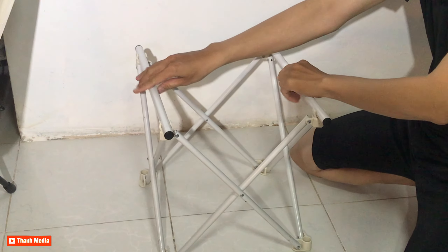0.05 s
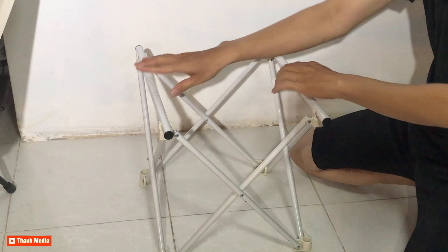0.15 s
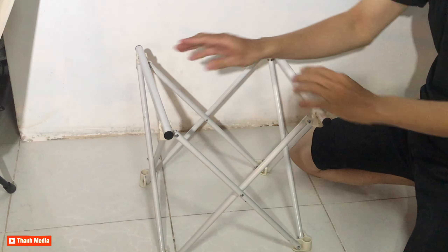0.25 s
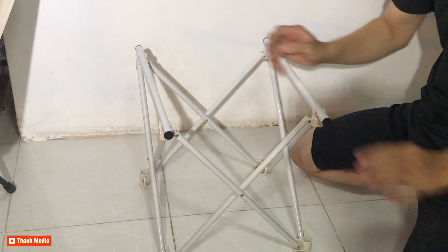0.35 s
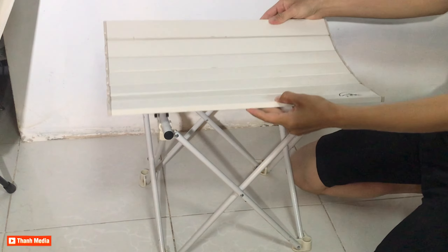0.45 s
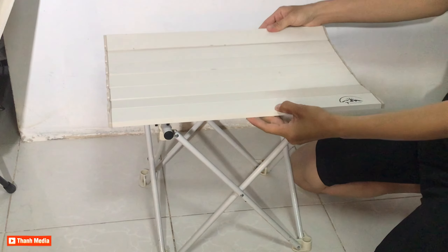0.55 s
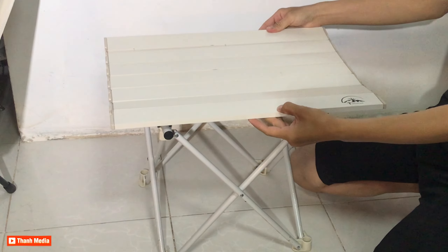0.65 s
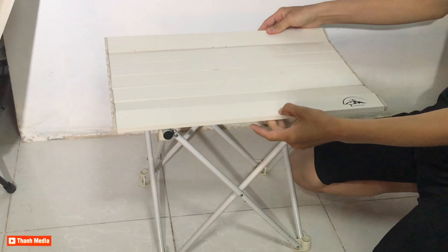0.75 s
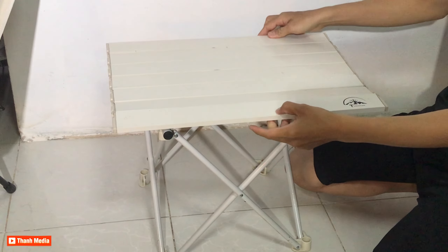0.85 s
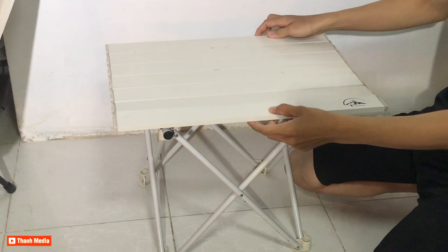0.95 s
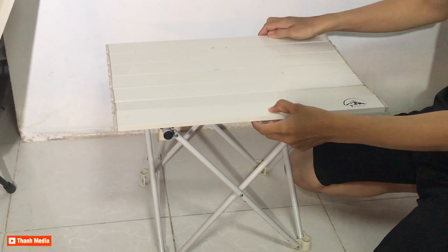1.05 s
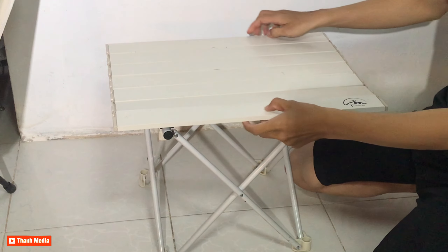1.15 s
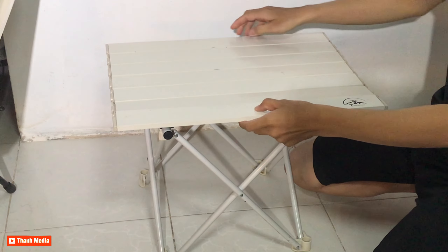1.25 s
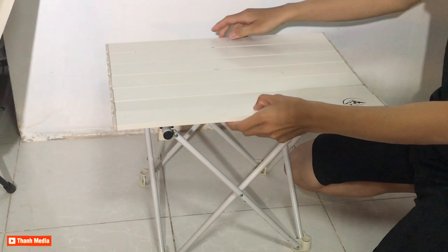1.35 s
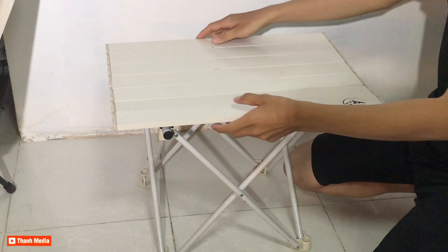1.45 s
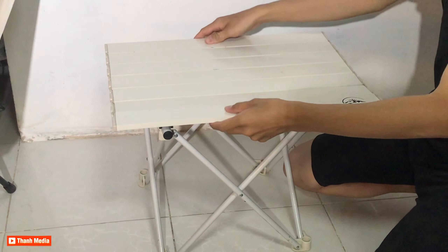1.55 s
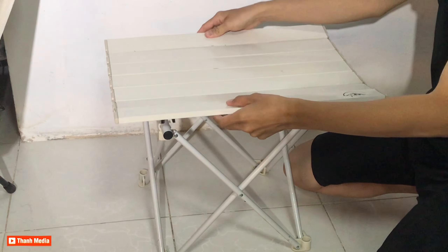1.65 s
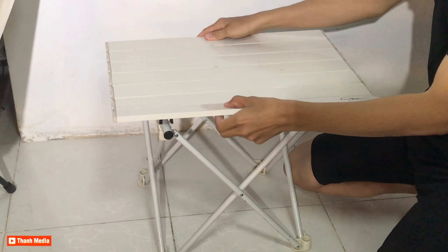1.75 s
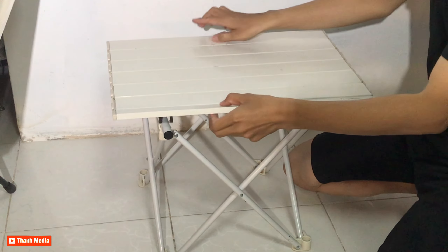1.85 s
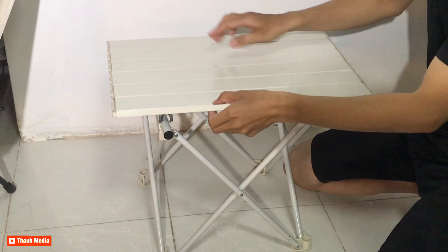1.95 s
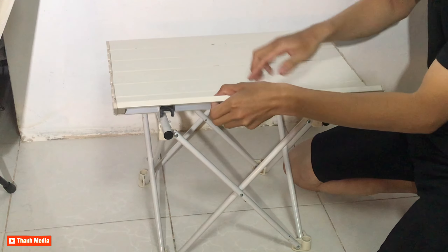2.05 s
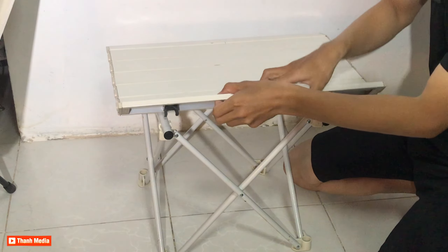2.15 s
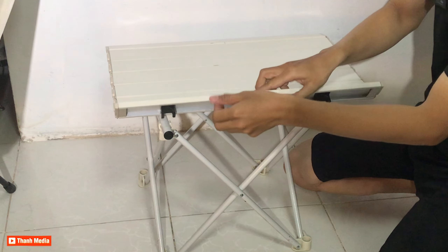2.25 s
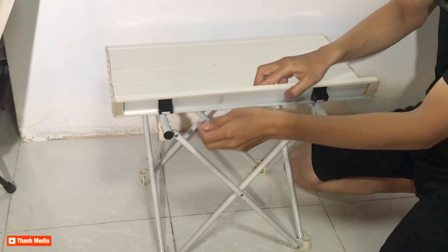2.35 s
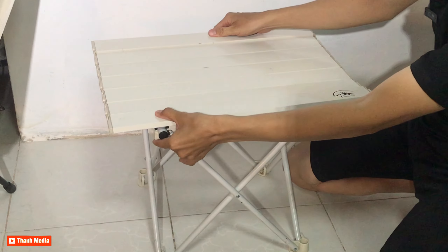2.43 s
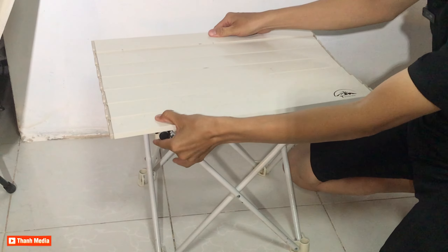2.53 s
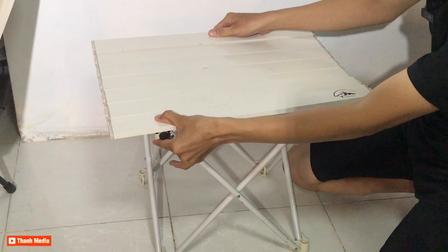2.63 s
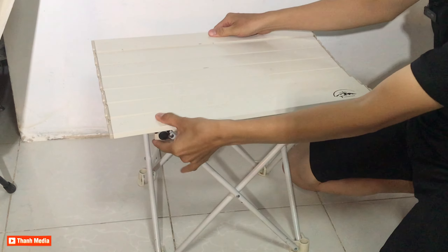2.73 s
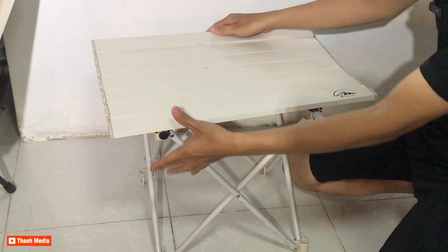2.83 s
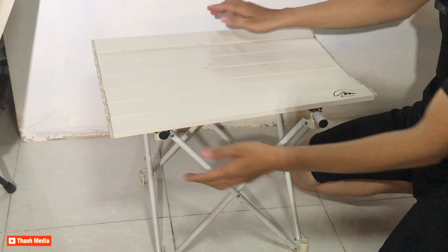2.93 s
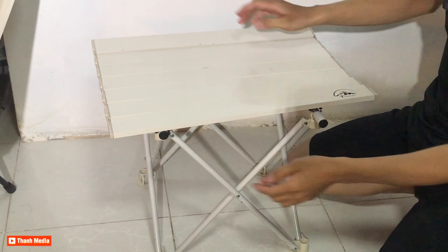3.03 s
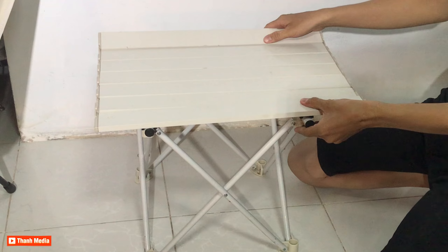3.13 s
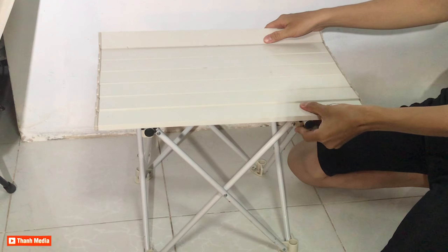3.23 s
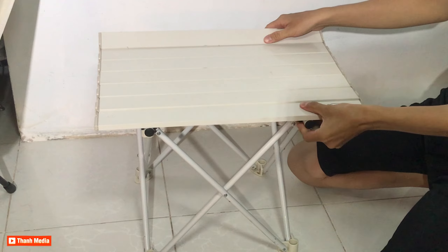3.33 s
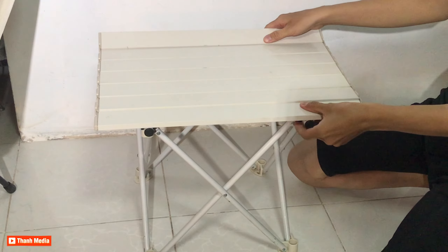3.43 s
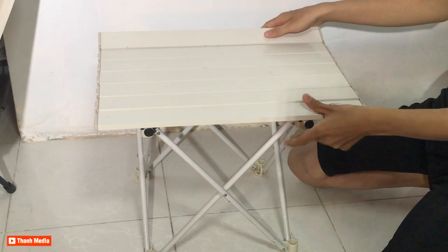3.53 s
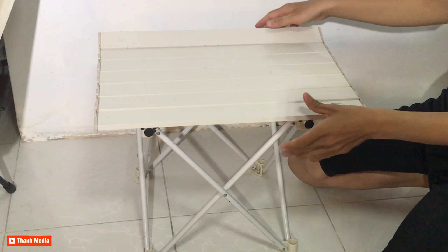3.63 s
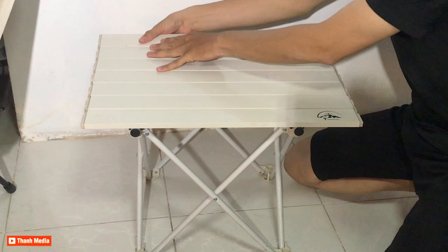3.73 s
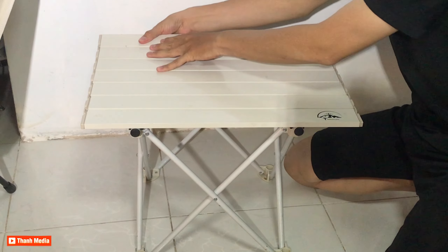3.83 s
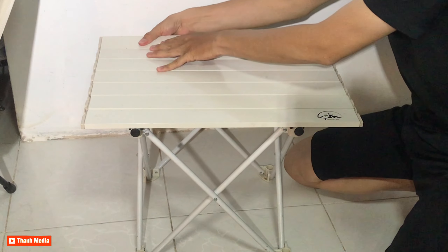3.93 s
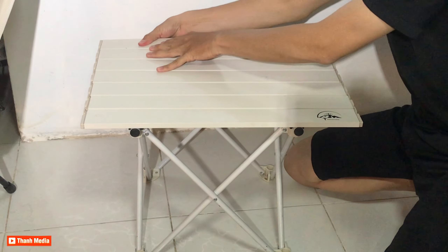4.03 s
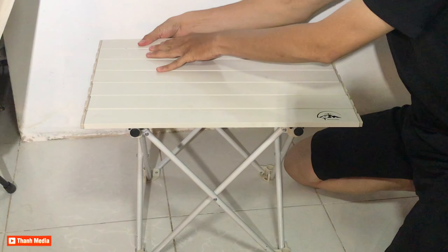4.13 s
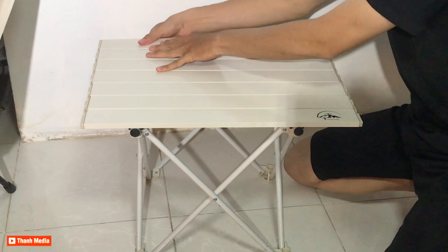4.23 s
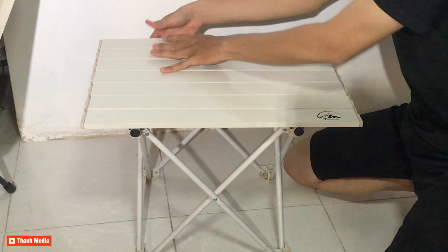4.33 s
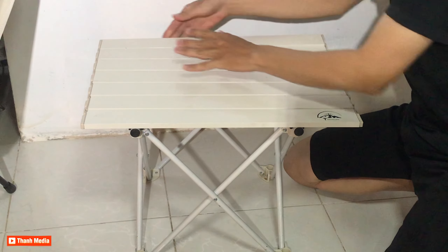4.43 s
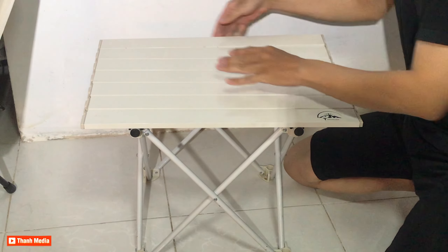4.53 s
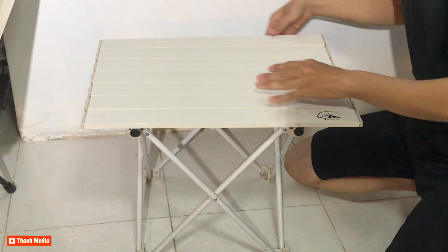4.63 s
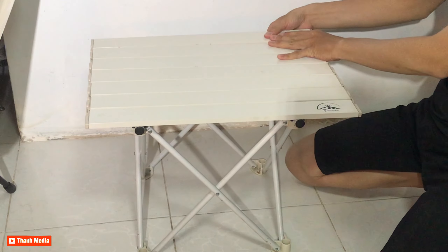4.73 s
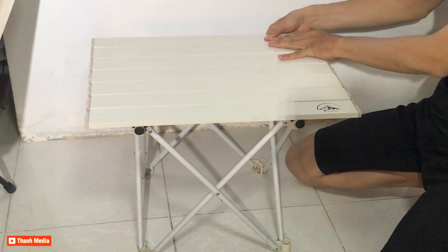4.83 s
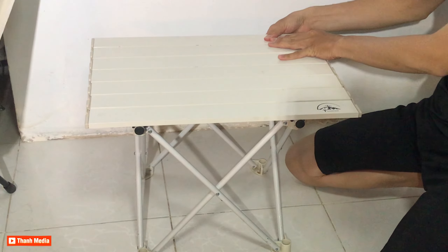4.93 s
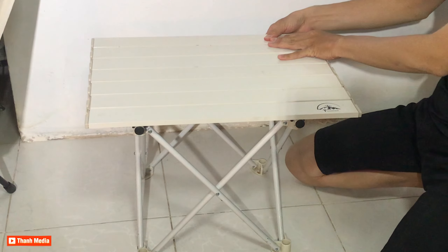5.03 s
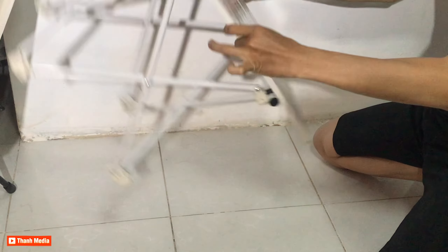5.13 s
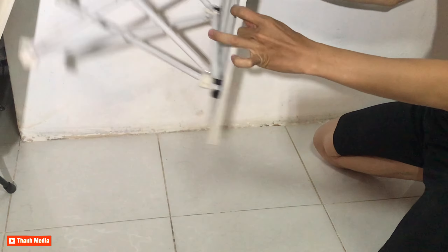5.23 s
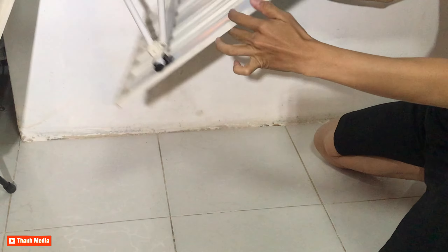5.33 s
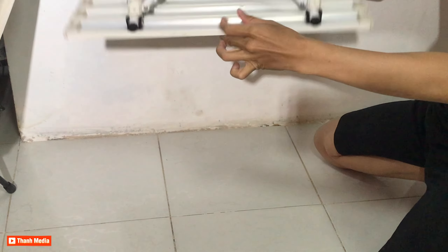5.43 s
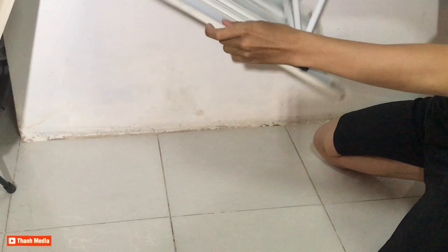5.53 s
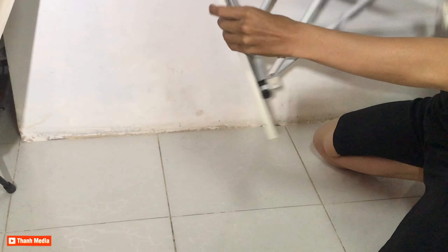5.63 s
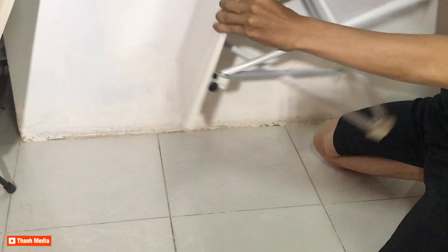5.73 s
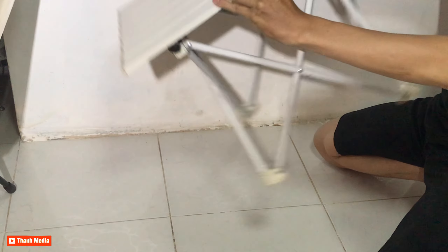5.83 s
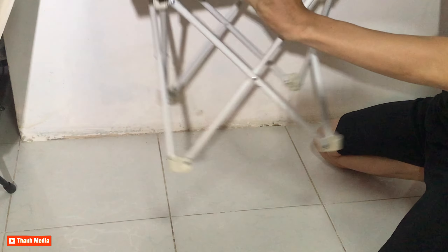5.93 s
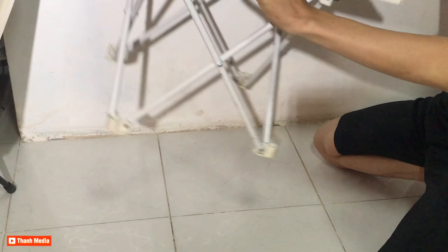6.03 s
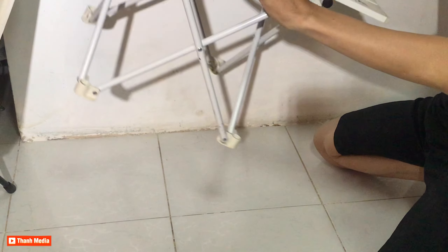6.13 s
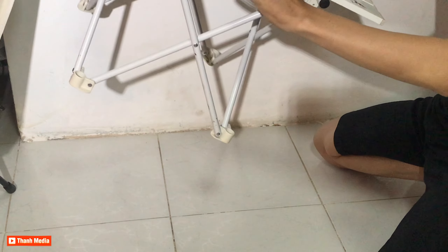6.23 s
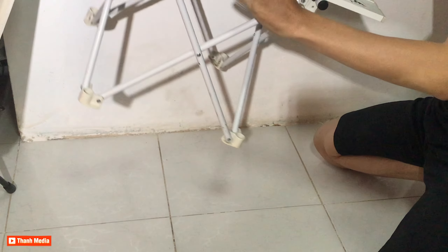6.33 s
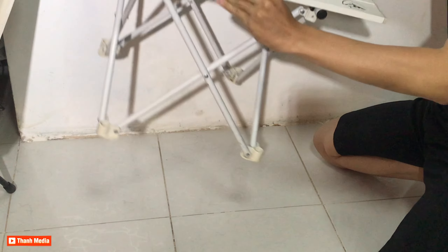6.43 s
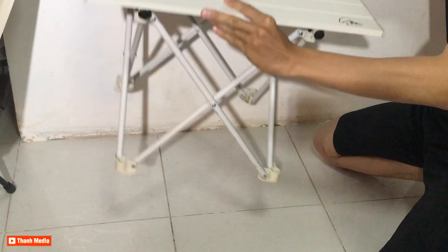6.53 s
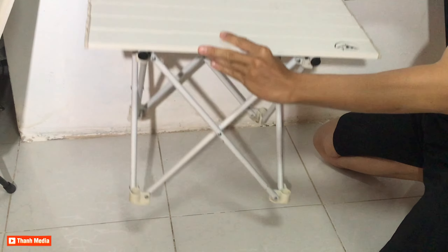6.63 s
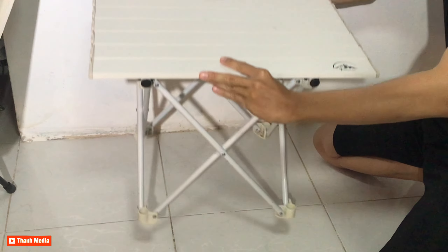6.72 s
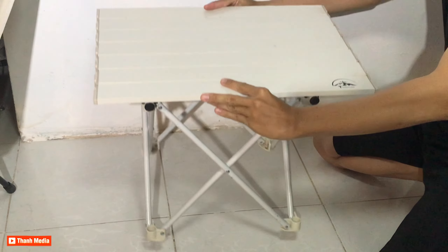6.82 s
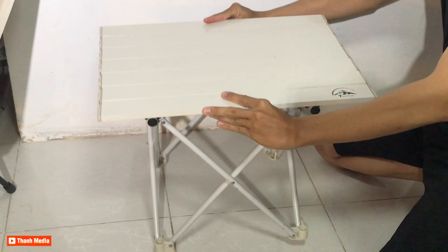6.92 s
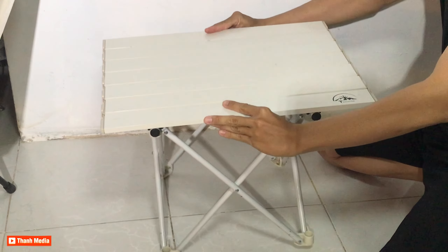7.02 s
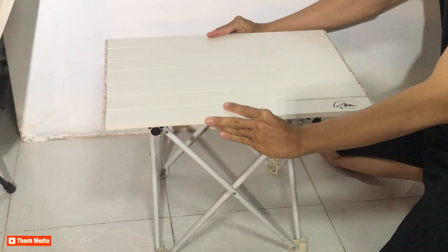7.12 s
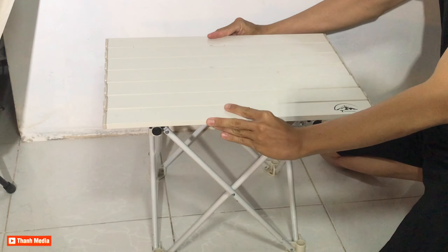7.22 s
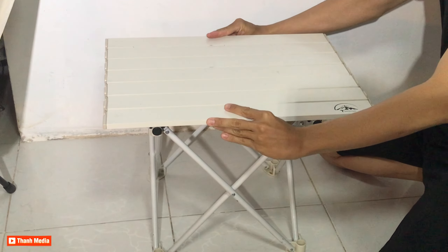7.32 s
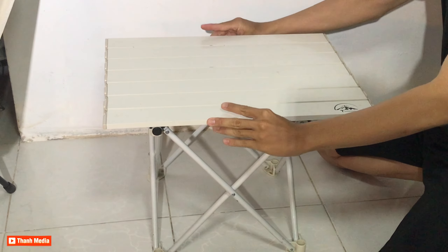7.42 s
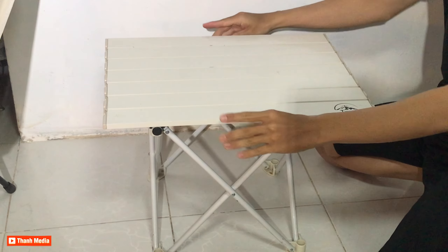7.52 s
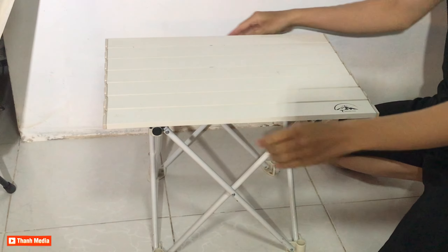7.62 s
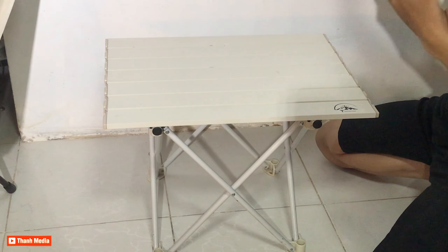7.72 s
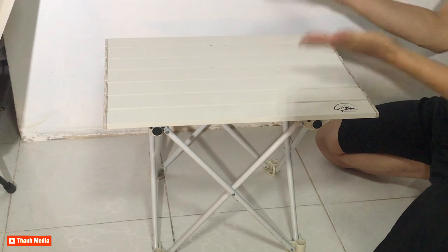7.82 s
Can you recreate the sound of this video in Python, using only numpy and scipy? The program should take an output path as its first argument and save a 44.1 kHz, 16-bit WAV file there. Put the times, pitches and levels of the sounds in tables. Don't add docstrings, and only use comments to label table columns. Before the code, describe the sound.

Close, sharp clacks and rattles as a folding table's top is fitted and snapped onto its tube legs, with quiet handling and softer knocks afterwards.

```python
import sys
import numpy as np
from scipy import signal
from scipy.fft import rfft, irfft
from scipy.io import wavfile
from scipy.ndimage import uniform_filter1d

SR = 44100
rng = np.random.default_rng(int(sys.argv[2]) if len(sys.argv) > 2 else 0)


def undo_db(level):
    steps = np.asarray(level, float) / 20
    return 10 ** steps


def transcribe(u):
    v = np.clip(np.atleast_2d(u).T, -1, 1)
    q = np.round(v * 32767).astype(np.int16)
    wavfile.write(sys.argv[1], SR, q)


N = 347067

# f/Hz, level/dB, t60/s
TABLE = [(215, -4, 0.33), (296, -4.5, 0.36), (532, -1, 0.16), (565, -5.5, 0.57), (721, -29.5, 0.54),
         (809.5, 4, 0.043), (960, -8, 0.099), (1000, -4, 0.12), (970, -9, 0.091), (1532, -3.5, 0.12),
         (1650, -5, 0.84), (1890, -5.5, 0.058)]
# f/Hz, level/dB, t60/s
SLATS = [(319, 3, 0.61), (559, 3, 0.4), (736, 5.5, 0.27), (900, -8, 0.35), (972, -14, 0.12),
         (1271, -18.5, 0.39)]
# f/Hz, t60/s
ROOM_T60 = [(150, 0.21), (400, 0.16), (1000, 0.26), (2800, 0.26), (7000, .25), (14000, 0.087)]


def rms_one(x):
    return x / np.sqrt(np.mean(x ** 2) + 1e-20)


def at_hz(points, hz):
    return np.interp(np.log(hz), np.log(np.array(points)[:, 0]), np.array(points)[:, 1])


def convolve(x, response):
    return signal.fftconvolve(x, response)[:N]


def bandpass(x, low_hz, high_hz):
    return signal.sosfilt(signal.butter(2, [low_hz, high_hz], "band", fs=SR, output="sos"), x)


def split(x, k):
    low_hz, high_hz = [(120, 450), (450, 2000), (2000, 4000), (4000, 15800)][k]
    return (-1) ** k * bandpass(x, low_hz, high_hz)


def colour(spectrum, peaks=()):
    hz = np.maximum(np.arange(2049) * SR / 4096, 10)
    level_db = at_hz(spectrum, hz)
    for top_hz, width_hz, db in peaks:
        level_db = level_db + db / (1 + (2 * (hz - top_hz) / width_hz) ** 2)
    cepstrum = irfft(np.log(undo_db(level_db)))
    cepstrum[1:2048] *= 2
    cepstrum[2049:] = 0
    response = irfft(np.exp(rfft(cepstrum)))
    return response / np.sqrt(np.sum(response ** 2))


def contact_colour():
    # f/Hz, level/dB per Hz
    crack = [(60, -65), (140, -32.5), (200, -4.5), (290, -7), (450, -6.5), (750, -3.5), (1050, -3.5),
             (1500, -10.5), (2050, -25.5), (3000, -28), (4000, -33.5), (6500, -37), (9500, -45),
             (15600, -56)]
    # f/Hz, width/Hz, level/dB
    bright = [(1710, 600, 3.5), (2680, 520, 9.5), (3750, 670, -2.5), (4650, 580, 6.5), (5563, 850, 7.5),
              (7280, 450, 7.5), (8350, 630, 5), (13600, 1200, 5.5)]
    return colour(crack, bright)


def ring(clicks, hz, t60):
    radius = undo_db(-60 / (t60 * SR))
    turn = 2 * np.pi * hz / SR
    return signal.lfilter([0, np.sin(turn)], [1, -2 * radius * np.cos(turn), radius ** 2], clicks + 1e-18)


def drift(rate):
    count = int(N / SR * rate) + 2
    return np.interp(np.arange(N), np.linspace(0, N, count), rng.standard_normal(count))


def grains(per_s, spread_db):
    happens = rng.random(N) < per_s / SR
    size = undo_db(spread_db * np.minimum(rng.exponential(1, N), 4))
    return happens * size * rng.choice([-1, 1], N)


def body(clicks, share):
    rings = sum(undo_db(level_db) * ring(clicks, hz, share * t60) for hz, level_db, t60 in TABLE + SLATS)
    broad = rms_one(convolve(clicks, contact_colour()))
    both = rms_one(undo_db(-8.5) * rms_one(rings) + broad)
    return [split(both, k) for k in range(4)]


def swelling_rings(rows, gain_db, rise_s):
    out, t = np.zeros(N), np.arange(6000) / SR
    for s, peak_db, hz, t60 in rows:
        fade = undo_db(peak_db + gain_db - 60 * t / t60)
        wave = np.sin(2 * np.pi * hz * t) * (1 - np.exp(-t / rise_s)) * fade
        out[round(s * SR) + 130:][:t.size] += wave
    return out


def ambience():
    # f/Hz, level/dB per Hz
    background = [(15, -29), (33, -4.5), (41, 5), (91, -8), (130, -9.5), (253, -15.5), (399, -16.5),
                  (469, -22), (597, -22), (1020, -33), (1900, -41.5), (2770, -37), (4250, -44),
                  (5560, -42.5), (15500, -47.5)]
    # f/Hz, width/Hz, level/dB
    hum = [(153.3, 9, -61), (368, 4.3, -74.5), (409, 3.1, -73), (567, 6, -77)]
    out, borders_hz = 0, [40, 200, 700, 2200, 19000]
    for low_hz, high_hz, patchy_db in zip(borders_hz, borders_hz[1:], [1.598, 1.0, 1.9, .6]):
        noise = convolve(rng.standard_normal(N), colour(background))
        out = out + undo_db(-53 + patchy_db * drift(30)) * bandpass(noise, low_hz, high_hz)
    for hz, width_hz, level_db in hum:
        once = ring(rng.standard_normal(N), hz, 2.2 / width_hz)
        out += undo_db(level_db) * rms_one(ring(once, hz, 2.2 / width_hz))
    return out


def motor():
    # f/Hz, level/dB rms
    tones = [(19, -66.5), (153.5, -59.5), (205, -70.5)]
    t = np.arange(N) / SR
    sway_db = 2.5 * np.sin(2 * np.pi * 1.7 * t) * np.sin(2 * np.pi * .6 * t)
    return sum(np.sqrt(2) * undo_db(level_db + sway_db) * np.sin(2 * np.pi * hz * t) for hz, level_db in tones)


def handling():
    # t/s, level/dB
    pace = [(0.0, -65), (0.35, -61.5), (0.95, -51), (1.3, -67), (1.7, -46.5), (1.9, -65), (2.15, -45),
            (2.4, -69), (2.9, -65.5), (3.4, -67), (3.8, -70.5), (4.14, -60), (4.5, -66), (5.1, -64),
            (5.6, -60), (6.0, -65.5), (7.2, -63), (7.87, -64)]
    s, level_db = np.transpose(pace)
    rub_db = np.interp(np.arange(N) / SR, s, level_db)
    rustle_db = -69 + 0.45 * (rub_db - rub_db.mean())
    thud, knock, clack, tick = body(grains(2600, 2.4) * undo_db(3.9 * drift(30)), share=.12)
    rub = undo_db(rub_db - 6.0) * (undo_db(1.5) * thud + knock + undo_db(-6.5) * clack)
    return rub + undo_db(rustle_db - 8.5) * rms_one(tick)


def ticks(length_s, width_share):
    # t/s, peak/dB, f/Hz
    joint_ticks = [(0.437, -53, 6160), (6.3, -69, 6410), (6.489, -71, 5830), (6.537, -64.5, 6180),
                   (6.6374, -57.5, 6330), (6.7334, -66.5, 5620), (6.7694, -71, 5940), (6.995, -61, 6450),
                   (7.6806, -56.5, 5670)]
    out, t = np.zeros(N), np.arange(1000) / SR
    for s, peak_db, hz in joint_ticks:
        puff = rng.standard_normal(t.size) * np.exp(-t / length_s)
        limits_hz = [hz * (1 - width_share), hz * (1 + width_share)]
        sos = signal.butter(1, limits_hz, "band", fs=SR, output="sos")
        out[round(s * SR):][:t.size] += undo_db(peak_db + 7.5) * signal.sosfilt(sos, puff)
    return out


def hits():
    # t/s, peak/dB, knock f/Hz, hardness/dB
    rattles = [(0.475, -7.5, 710.4, 5), (0.488, -12.5, 560, 0), (0.499, -14, 960, 15), (0.523, -14, 970, 1),
               (0.544, -17, 490, 9), (0.589, -17, 1560, -10), (0.63, -21, 1040, -10),
               (0.71, -24.5, 1006, -11), (0.737, -12.5, 565, 2.5), (0.831, -23, 970, -0.5),
               (0.894, -10, 781, 1.5), (1.668, -35, 569, -13), (1.709, -16, 837, 0), (1.729, -11, 1510, 1),
               (1.752, -3.5, 1155, -4), (1.845, -22.5, 1620, -7), (1.876, -31, 910, -6),
               (1.891, -27.5, 990, -4.5), (2.011, -31.5, 721, -34), (2.133, -33, 710, -7),
               (2.155, -11.5, 765, 0.5), (2.179, -16.5, 718, -4.5), (2.206, -9, 708.5, -1.5),
               (2.241, -11.5, 970, -6), (7.045, -28, 540, 7.5), (7.069, -21, 700, 2.5),
               (7.164, -28, 730, -3), (7.19, -10.5, 785, -8), (7.219, -20, 500, 3.5),
               (7.249, -21.5, 710, -7)]
    # t/s, peak/dB, knock f/Hz, hardness/dB
    snaps = [(2.5155, -16.5, 890, 3), (2.519, 0, 717, 3.5), (2.543, -5.5, 1478, -11),
             (2.587, -10.5, 791, 0), (3.2035, 1.5, 746, 2.5), (3.209, -12.5, 287, -9.5),
             (3.251, -17.5, 912, 4), (3.934, -15.5, 704, -2.5), (3.959, -8.5, 562, -2.5),
             (4.008, 0.5, 1080, 2.5), (4.046, -11, 1085, -9.5), (4.834, -13.5, 1197, 2),
             (4.846, -0.5, 290, -1), (4.856, -13.5, 780, -4.5), (5.277, -19, 466, 1.5),
             (5.756, -15.5, 730, 0.5), (5.765, -23, 487, -2), (5.789, -23, 1104, -10.5)]
    # t/s, peak/dB, knock f/Hz, hardness/dB
    taps = [(1.194, -32, 1140, 0), (1.254, -45, 296, 3), (1.317, -43, 706, 9), (1.526, -48, 826, 6.5),
            (1.576, -40, 835, 4), (1.631, -40, 972, 4), (2.413, -41, 267, -1), (2.774, -38, 360, 2),
            (2.834, -40, 970, 1), (3.006, -39, 865, -0.5), (3.164, -36.5, 764, -3), (3.442, -51, 287, 12),
            (3.514, -49.5, 1280, 15.5), (3.641, -54.5, 270.4, 6), (4.28, -37, 696, 2.5),
            (4.31, -40.5, 830, 3.5), (4.808, -44, 544, -2)]
    # t/s, peak/dB, knock f/Hz, hardness/dB
    shifts = [(5.129, -46.5, 730, -7.5), (5.213, -41.5, 477, -15), (5.239, -40.5, 463, 1),
              (5.299, -59, 590, 0), (5.318, -51.5, 550, 13.5), (5.352, -37.5, 560, 4),
              (5.416, -44.5, 348, 5), (5.45, -44, 990, 5), (5.518, -46.5, 920, 3), (5.551, -33, 320, -4),
              (5.581, -45, 580, 10), (5.69, -44, 483, -6), (5.919, -45, 258.4, 2), (6.218, -48, 255.4, -8),
              (6.959, -52.5, 403.5, 13.5), (7.397, -42.5, 1460, 1.5)]
    hardness_share = (-0.2, 0.9, 1)
    kinds = [(rattles, (-14, -11.5, -20)), (snaps, (-13, -14.5, -17)),
             (taps, (-6, -16.5, -22)), (shifts, (2, -15, -20))]
    out = []
    for rows, kind_db in kinds:
        for s, peak_db, hz, hard_db in rows:
            low_db = -2 * np.log2(hz / 700)
            colour_db = np.add(kind_db, np.multiply(hardness_share, hard_db)) + [low_db, 0, 0]
            out.append((s, peak_db, *colour_db, hz))
    return sorted(out)


def chatter_of(size, touch, peak_db, chatter_s):
    t = np.arange(size.size) / SR
    linger_s = chatter_s * undo_db(-.2 * (peak_db + 12.0))
    chatter = size * (touch > 1.2) * np.minimum(t / .0012, 1) * np.exp(-t / linger_s)
    tones = rfft(chatter)
    rise_s = .0015 * undo_db(-.45 * (peak_db + 5.5))
    chatter = irfft(tones / np.abs(tones) ** .6) * np.minimum(t / rise_s, 1) * np.exp(-t / (3 * chatter_s))
    return chatter / np.sqrt(np.sum(chatter ** 2))


def contacts(ring_db, knock_db, crack_db, spread_db, chatter_s, knock_t60):
    modes, touch_n, t = np.array(TABLE + SLATS), 1024, np.arange(5000) / SR
    out, crack = np.zeros(N + t.size), np.zeros((4, N + touch_n))
    usual_db = np.array([-6, 1.5, -17, -22.5])
    mode_fade = undo_db(-60 * t / (0.22 * np.minimum(modes[:, 2:], .28)))
    swell = 1 - np.exp(-t / 0.0009)
    for s, peak_db, thud_db, clack_db, tick_db, knock_hz in hits():
        at = round(s * SR)
        band_db = peak_db + np.array([thud_db, 0, clack_db, tick_db]) - usual_db
        size, touch = rng.standard_normal((2, touch_n))
        strength, tune = rng.standard_normal((2, len(modes)))
        crack[:, at:at + touch_n] += undo_db(band_db)[:, None] * chatter_of(size, touch, peak_db, chatter_s)

        blow_db = np.where(modes[:, 0] < 450, band_db[0], peak_db)
        gains = undo_db(modes[:, 1] + blow_db + spread_db * strength)
        hz = modes[:, :1] * (1 + 0.034 * tune[:, None])
        rings = gains @ (np.sin(2 * np.pi * hz * t + 9 * tune[:, None]) * mode_fade)

        one_db = peak_db + knock_db - 0.1 * (peak_db + 10.0)
        one_t60 = knock_t60 * undo_db(0.14 * (peak_db + 9.5))
        knock = np.sin(2 * np.pi * knock_hz * t) * undo_db(one_db - 60 * t / one_t60)
        out[at:at + t.size] += (undo_db(ring_db) * rings + knock) * swell
    broad = sum(split(crack[k, :N], k) for k in range(4))
    return out[:N] + undo_db(crack_db) * convolve(broad, contact_colour())


def answers():
    # t/s, peak/dB, f/Hz, t60/s
    slat_answers = [(0.474, -23.5, 1260, 0.054), (0.506, -15.5, 1500, 0.054), (0.515, -11.5, 530, .05),
                    (0.536, -26, 770, 0.032), (0.554, -17, 1470, .04), (0.588, -30, 2710, 0.091),
                    (0.742, -34, 308, 0.068), (0.904, -27, 1360, 0.036), (1.712, -24, 255, 0.067),
                    (1.721, -28, 907, 0.049), (1.742, -19, 985, 0.036), (2.17, -29, 215, .05),
                    (2.188, -21, 1275, .04), (2.204, -17, 1250, .04), (2.209, -21, 974, 0.037),
                    (2.2035, -6, 700, .025), (3.203, -14, 480, .1), (3.2005, -8, 767, 0.054),
                    (2.26, -24, 1260, 0.065), (2.517, -15, 1639, 0.066), (2.516, -8.5, 720, 0.036),
                    (4.852, -15, 760, .05), (1.873, -41, 896, 0.036), (2.519, -22, 2520, .06),
                    (2.53, -14.5, 926, 0.067), (2.535, -15.5, 1172, .04), (2.538, -20, 2684, .05),
                    (2.586, -29.5, 1220, 0.049), (3.232, -18.5, 530, .08), (4.005, -11.5, 791, .05),
                    (4.006, -16.5, 1097, .08), (4.01, -15, 1620, 0.046), (4.03, -21.5, 764, 0.13),
                    (4.845, -8, 769, 0.032), (4.834, -23, 1243, 0.052), (4.872, -19, 720, 0.067),
                    (.52, -24.5, 201.8, .12), (4.846, -19.5, 370, .04), (5.273, -25, 1050, .03),
                    (5.273, -33, 520, .03), (5.352, -44, 1350, .04), (5.447, -55, 1000, .2),
                    (5.515, -47, 930, .07), (7.205, -39, 900, .06), (7.248, -29, 950, .05),
                    (7.085, -34, 1100, .05), (5.776, -23, 1306, 0.042), (5.779, -29, 1090, 0.043),
                    (7.063, -28, 750, .05), (3.957, -20, 612, .07), (3.957, -29, 1064, .07)]
    return swelling_rings(slat_answers, gain_db=5.0, rise_s=0.0022)


def shudders():
    # t/s, peak/dB, f/Hz, t60/s
    floor_shudders = [(0.474, -35.5, 100, 0.11), (0.515, -38.5, 125, .12), (0.59, -35, 190, .15),
                      (0.737, -40, 110, .1), (1.71, -39, 120, .12), (1.752, -45, 50, .15),
                      (2.206, -42, 100, .2), (2.565, -31.5, 120, 0.11), (3.2, -31.5, 50, .15),
                      (3.2, -40, 120, .15), (4.003, -35, 50, .12), (4.003, -27.5, 162.6, .08),
                      (4.842, -40.5, 50, .12), (4.842, -20, 168, .1), (6.15, -46, 80, .08),
                      (7.18, -35.5, 110, 0.2)]
    return swelling_rings(floor_shudders, gain_db=1.5, rise_s=0.004)


def bare_edges():
    # t/s, peak/dB, brightness/dB
    edge_clicks = [(0.475, -15, -7.5), (0.4815, -19.5, 6), (0.5037, -16.5, 5.5), (0.5565, -26, -1.5),
                   (0.5772, -23, 1), (0.618, -35.5, 0.5), (0.824, -44, 2.5), (1.7269, -16, 0),
                   (1.7553, -10.5, 6.5), (1.8915, -30, -8), (2.1645, -26, 1), (2.186, -27, 3),
                   (2.2081, -17.5, -3), (2.2157, -31, 1), (2.2616, -30, -1.5), (2.2766, -32, -9),
                   (2.333, -49, 6), (3.299, -30.5, 4), (3.352, -38, 6.5), (4.1112, -38.5, 1.5),
                   (5.625, -51.5, 0), (0.83, -35, 5), (1.877, -40, -8), (5.5515, -50, 7), (5.727, -53, -9),
                   (7.0454, -34, -1.5), (7.101, -40, -3.5), (7.246, -35, -5), (7.275, -33, -4)]
    dull, sharp = np.zeros((2, N))
    s, peak_db, bright_db = np.transpose(edge_clicks)
    at = (s * SR).astype(int)
    dull[at] = undo_db(peak_db + 12.0)
    sharp[at] = undo_db(peak_db + bright_db + 16.0)
    return convolve(split(dull, 1) + split(dull, 2) + split(sharp, 3), contact_colour())


def glints():
    # t/s, peak/dB, f/Hz, t60/s
    flashes = [(0.477, -44, 13500, .04), (0.506, -42, 13600, .06), (0.505, -30, 7400, .06),
               (1.724, -51, 13600, .05), (1.752, -44, 11500, .015), (2.203, -52, 13800, .04),
               (2.254, -41, 8500, .03), (2.254, -48, 10500, .03), (2.254, -52, 13300, .03),
               (2.245, -40, 7300, .04), (2.515, -38, 13800, .05), (2.515, -44, 15000, .03),
               (3.201, -38, 13600, .05), (3.201, -42, 15000, .04), (7.066, -53, 7300, .06),
               (7.085, -50, 8500, 0.033), (7.19, -33, 2700, 0.057), (7.066, -37, 2750, .06),
               (7.26, -57, 7300, .08)]
    return drift(900) * swelling_rings(flashes, gain_db=0.0, rise_s=0.001)


def slides():
    # touch t/s, let go t/s, level/dB, change while dragged/dB
    drags = [(0.478, 0.55, -11.5, 1.5), (0.581, 0.59, -14.5, -4.5), (0.632, 0.887, -34.5, -4),
             (1.655, 1.716, -38, 9), (1.711, 1.748, -10, -9.5), (2.093, 2.154, -45, 15),
             (2.155, 2.193, -20.5, 4.5), (7.045, 7.083, -24.5, 1.5), (7.156, 7.171, -42, 19),
             (7.193, 7.214, -18.5, -4.5), (2.012, 2.086, -44, 1.5), (3.511, 3.552, -54, -1.5),
             (5.279, 5.33, -45, -14.5), (5.754, 5.79, -25, -10), (1.26, 1.339, -47, -4.5),
             (2.517, 2.556, -9, -8), (3.205, 3.252, -11, -4), (4.009, 4.065, -16.5, -4.5),
             (4.84, 4.884, -14, -7.5), (2.206, 2.268, -30, 3), (7.229, 7.248, -27, -9.5)]
    thud, knock, clack, tick = body(grains(2500, 2.2), share=0.0086)
    level = np.zeros(N)
    for start_s, end_s, level_db, change_db in drags:
        near = np.arange(round((start_s - .02) * SR), round((end_s + .3) * SR))
        t = near / SR
        drag_db = level_db + np.interp(t, [start_s, end_s], [0, change_db])
        grip_db = 6000 * np.maximum(start_s - t, 0)
        let_go_db = 388.5 * np.maximum(t - end_s, 0)
        level[near] += undo_db(drag_db - grip_db - let_go_db - 12.0)
    return level * (undo_db(4.0) * thud + knock + clack + tick)


def clinks():
    # t/s, peak/dB, f/Hz, t60/s
    lone_rings = [(0.478, -20, 730, 0.06), (0.737, -17, 1520, 0.036), (1.193, -27.5, 1660, 0.017),
                  (1.275, -53.5, 1440, 0.16), (2.516, -25.5, 7270, 0.068), (3.204, -18.5, 1026, 0.23),
                  (4.008, -17, 998, 0.095), (4.845, -23, 879, 0.23), (4.846, -34, 1024, 0.13),
                  (4.846, -16.5, 2680, 0.037), (5.315, -31, 2540, 0.024), (5.52, -57, 2620, 0.07),
                  (5.58, -56, 2600, 0.089), (5.34, -55, 2600, 0.1), (7.06, -30.5, 556, 0.16),
                  (7.19, -29, 754, 0.21), (7.195, -25.5, 882, 0.19), (7.394, -45, 1473, 0.036)]
    return swelling_rings(lone_rings, gain_db=4.0, rise_s=0.0025)


def tubes(x):
    # from f/Hz, to f/Hz, level/dB, t60/s
    clusters = [(2500, 2880, -16, 0.29), (835, 1150, -16.5, 0.28)]
    t, response = np.arange(SR // 2) / SR, 0
    for low_hz, high_hz, level_db, t60 in clusters:
        band = rms_one(bandpass(rng.standard_normal(t.size), low_hz, high_hz))
        response = response + band * undo_db(level_db - 38.5 - 60 * t / t60)
    return convolve(x, response)


def even_out(response, air_db, shine_db):
    hz = np.arange(1, response.size // 2 + 1) * SR / response.size
    power = uniform_filter1d(np.abs(rfft(response)[1:]) ** 2, size=90)
    lift_db = 10 * np.log10(at_hz(ROOM_T60, hz) / power)
    lift_db += air_db * np.clip(np.log2(hz / 8000), 0, 1)
    lift_db += shine_db * np.exp(-np.log2(hz / 5000) ** 2 / .2)
    lift_db = np.clip(lift_db - np.median(lift_db), -15, 15)
    return signal.fftconvolve(response, colour(np.c_[hz, lift_db]))[:response.size]


def room(x):
    moves_s = [0, 0.72, 0.88, 1.45, 1.98, 2.47, 3.12, 3.85, 4.0, 4.7, 5.2, 5.7, 6.8, 7.14]
    spot_air_db = [0.5, -10.5, -3, 6.5, 0.5, 4, -0.5, -1, 7, -2.5, 5.5, 1, -4, -3]
    spot_shine_db = [2.5, 0., 0, 0.5, 2.5, 1, -0.5, -0.5, 1.5, -1.5, 0., -2., -1, 3]
    t, out = np.arange(SR // 2) / SR, np.zeros(N + SR)
    lows_hz = 60 * 2 ** np.arange(9.)
    starts = (np.array(moves_s) * SR).astype(int)
    for start, end, air_db, shine_db in zip(starts, [*starts[1:], N], spot_air_db, spot_shine_db):
        response = 0
        for low_hz in lows_hz:
            band = bandpass(rng.standard_normal(t.size), low_hz, min(low_hz * 2, 19000))
            response = response + band * undo_db(-60 * t / at_hz(ROOM_T60, low_hz * 1.4))
        response = even_out(response * np.clip((t - .002) / 0.0026, 0, 1), air_db, shine_db)
        echo = signal.fftconvolve(x[start:end], response / np.sqrt(np.sum(response ** 2)))
        out[start:start + echo.size] += echo
    return out[:N]


def bumps(cycles, gain_db):
    # t/s, peak/dB, f/Hz
    floor_bumps = [(0.501, -35, 127), (1.758, -37, 81), (2.517, -29, 88), (3.204, -40, 35.7),
                   (4.011, -30, 109), (6.157, -36, 131), (6.185, -36.5, 58.7), (6.203, -34.5, 119.5),
                   (6.36, -37.5, 32.6), (7.05, -39, 106), (7.149, -39, 127), (7.189, -29, 50),
                   (7.22, -44, 56)]
    out = np.zeros(N)
    for s, peak_db, hz in floor_bumps:
        at, t = round(s * SR), np.arange(int(3 * cycles / hz * SR)) / SR
        age = t * hz / cycles
        wave = np.sin(2 * np.pi * hz * t + rng.uniform(0, 1)) * age * np.exp(1 - 4 * age) * 4
        out[at:][:t.size] += undo_db(peak_db + gain_db) * wave[:N - at]
    return out


def thuds():
    # t/s, peak/dB, f/Hz, t60/s
    thumps = [(0.524, -9.5, 302, 0.03), (0.736, -23, 297, 0.051), (0.893, -20.5, 198, 0.029),
              (1.752, -9.5, 172, 0.018), (2.206, -32, 165, 0.036), (1.712, -19.5, 468, 0.096),
              (2.156, -17, 202, 0.04), (2.517, -2.5, 362, 0.03), (3.203, -1, 276.8, 0.052),
              (3.958, -29, 390, 0.042), (4.004, 3.5, 368, 0.023), (4.844, -6.5, 293, 0.037),
              (5.274, -27, 418, 0.028), (5.554, -23.5, 180, 0.026), (5.582, -34, 409, 0.043),
              (6.218, -30.5, 183.9, 0.04), (7.044, -26.5, 162, 0.089), (7.15, -27, 192, 0.083),
              (7.188, -25, 167, 0.047)]
    return swelling_rings(thumps, gain_db=-0.5, rise_s=0.0012)


def drop_out(quiet):
    # from t/s, to t/s, level/dB
    dropouts = [
        (0.449, 0.461, -13),
        (2.434, 2.442, -17),
    ]
    for start_s, end_s, level_db in dropouts:
        quiet[round(start_s * SR):round(end_s * SR)] *= undo_db(level_db)
    return quiet


def scene():
    table = contacts(ring_db=-22.0, knock_db=-5.0, crack_db=14.0, spread_db=5.0,
                     chatter_s=0.0092, knock_t60=0.039)
    table = table + slides() + bare_edges() + thuds()
    table = signal.sosfilt(signal.butter(3, 145, "high", fs=SR, output="sos"), table)
    quiet = ambience() + motor() + handling()
    quiet = quiet + ticks(length_s=0.0026, width_share=0.12) + bumps(cycles=2.5, gain_db=-4.5)
    struck = clinks() + glints() + answers() + shudders()
    return (table + undo_db(-5.0) * room(table) + tubes(table) + struck + drop_out(quiet))[None]


def top_cut(x):
    return signal.sosfilt(signal.butter(12, 15610, fs=SR, output="sos"), x)


def record(dry):
    clipped = 1.394 * np.tanh(dry / 1.503)
    mix = signal.sosfilt(signal.cheby2(10, 60, 17000, fs=SR, output="sos"), clipped)
    return top_cut(mix)


dry = scene()
out = record(dry)
transcribe(out)
```